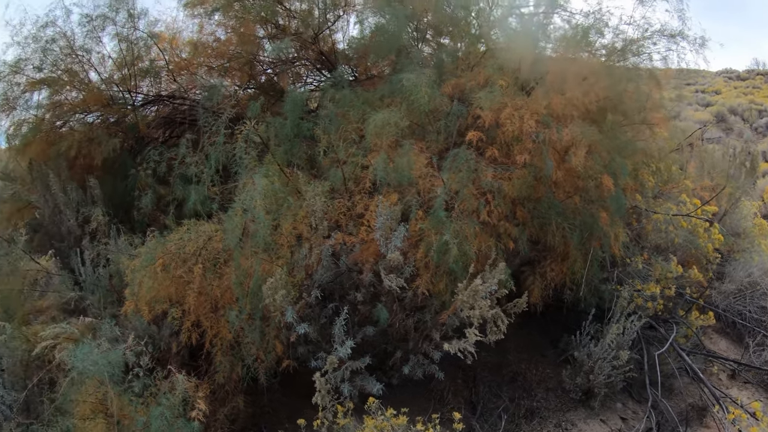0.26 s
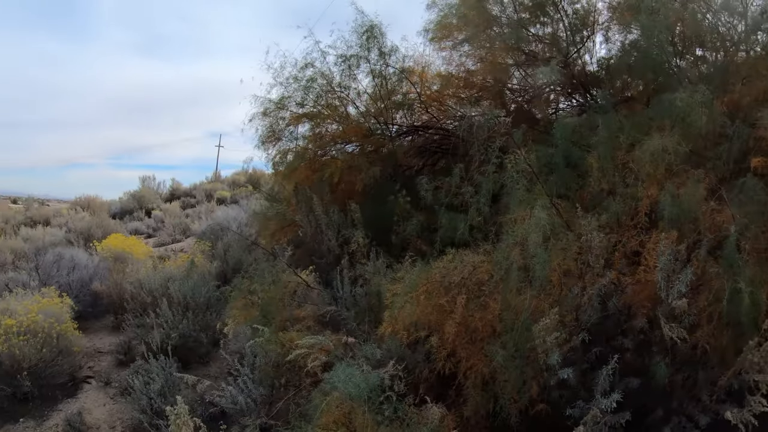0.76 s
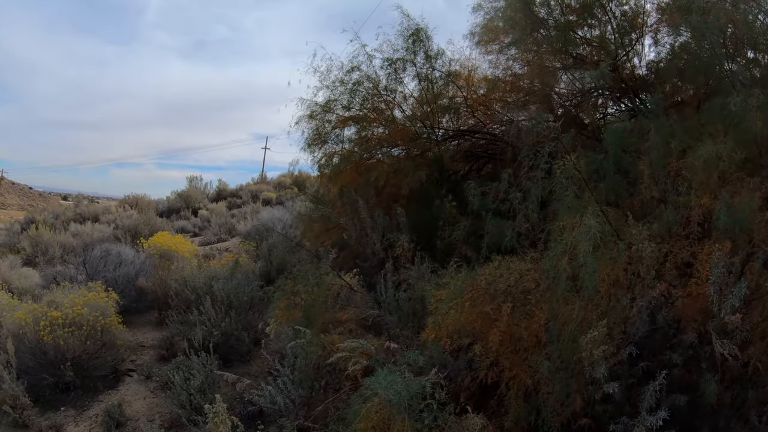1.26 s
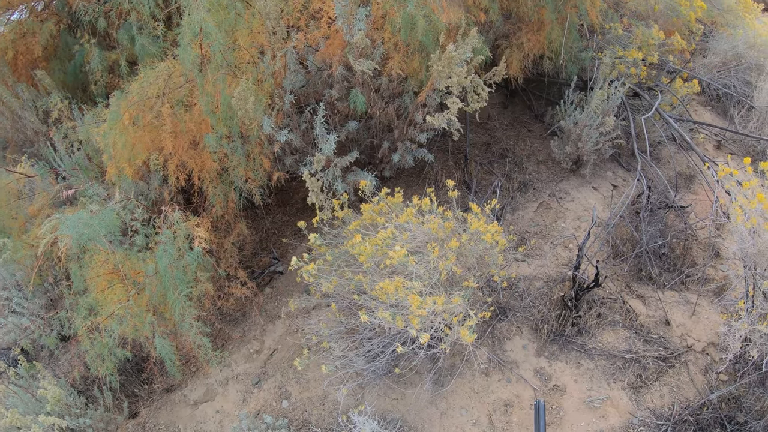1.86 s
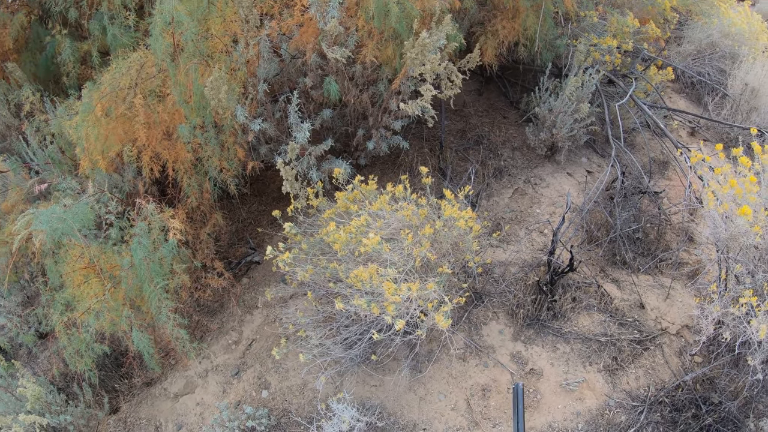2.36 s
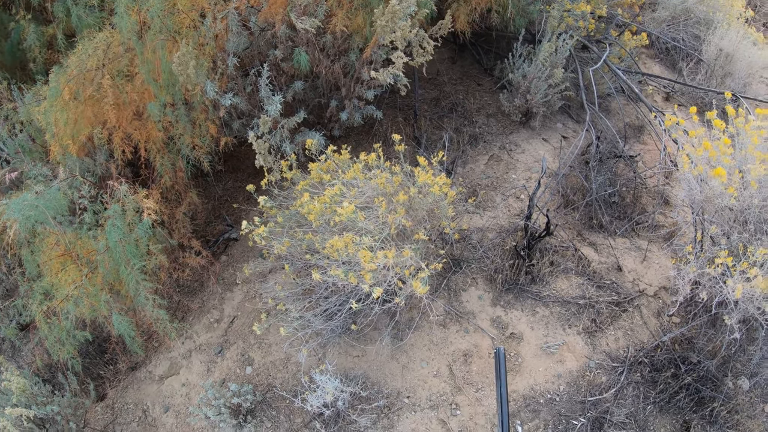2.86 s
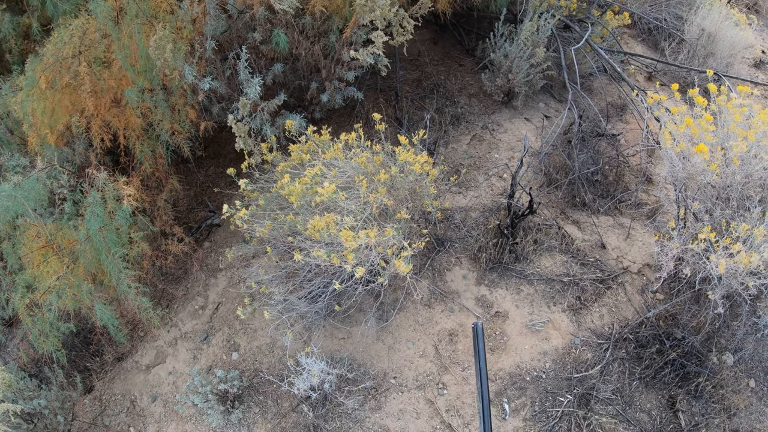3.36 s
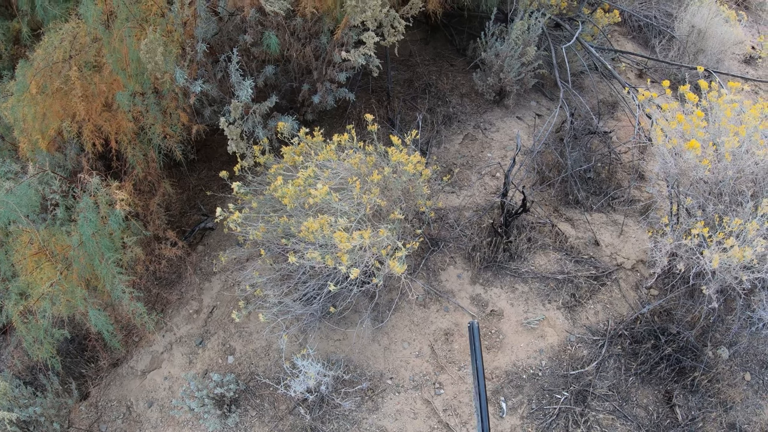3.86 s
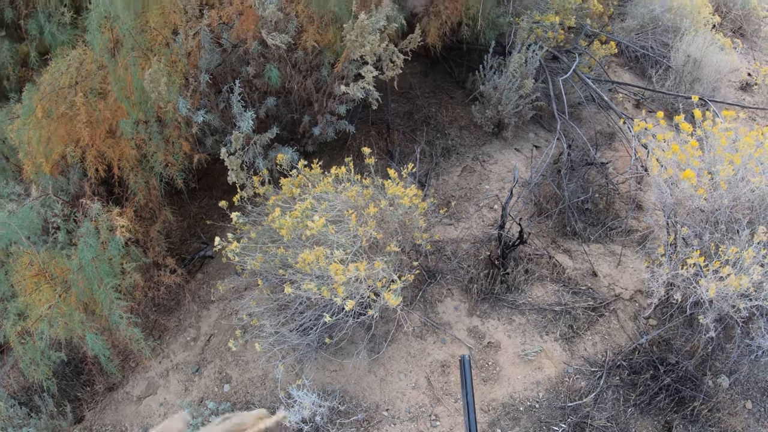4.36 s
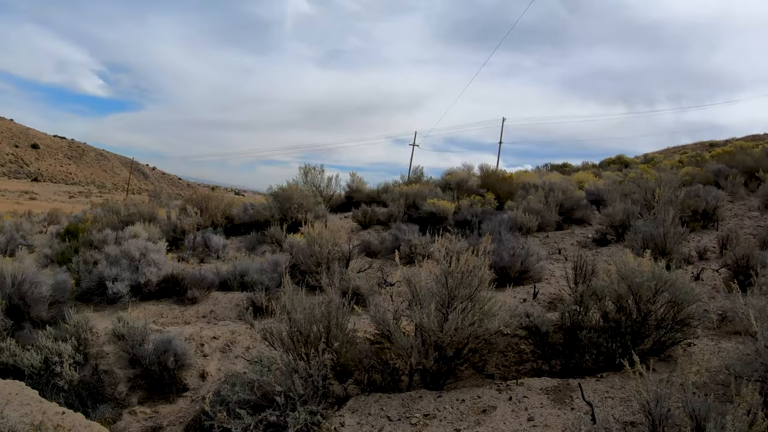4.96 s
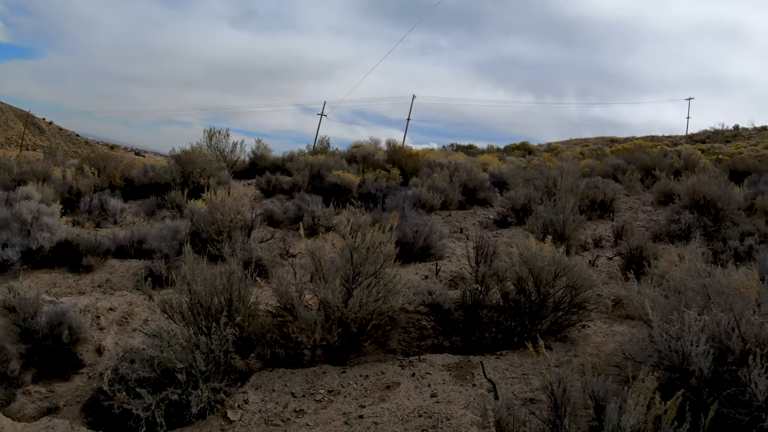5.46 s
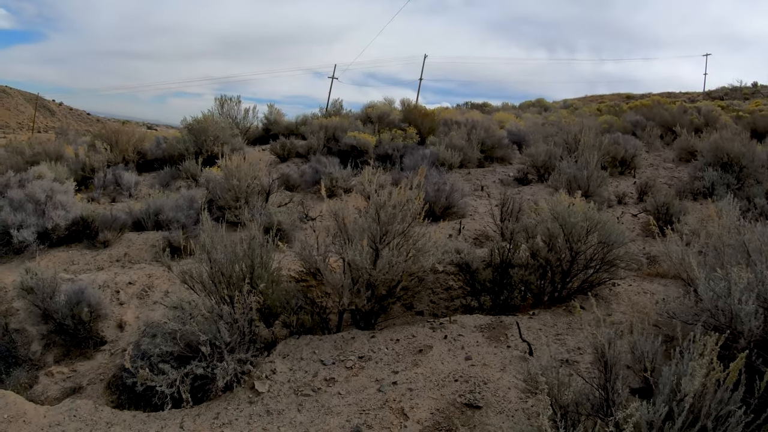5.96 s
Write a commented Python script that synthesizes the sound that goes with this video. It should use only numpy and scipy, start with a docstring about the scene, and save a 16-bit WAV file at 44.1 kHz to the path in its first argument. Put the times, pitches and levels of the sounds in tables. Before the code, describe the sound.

Low, unsteady wind rumble on a hand-held microphone runs throughout, with airy breeze and soft hiss. Quail call at once with three short nasal notes, pause, then call again more strongly from the middle distance, and finally lower and weaker. Small clicks mark sudden background shifts. Dry twig snaps, thin rustles and tiny bird chips dot the open scrub, with more handling bumps and a deep gust near the end.

```python
"""Quail in desert scrub

Quail call from the brush: short arched, reedy notes, some strong and some faint, each a sum of
seven harmonics coloured by throat resonances. Wind is shaped noise: buffeting and rumble on a
hand-held microphone, a distant rush of air and a breeze in the brush; its colour shifts between
stretches, with a click at two of the shifts. Dry twigs tick and bumps knock the housing as damped
rings, rustles are uneven crackle, and a small bird chips in swept tones."""
import sys
import numpy as np
from scipy import signal
from scipy.fft import rfft, irfft, next_fast_len
from scipy.io import wavfile
from scipy.ndimage import uniform_filter1d

SR = 44100
rng = np.random.default_rng(int(sys.argv[2]) if len(sys.argv) > 2 else 0)


def transcribe(u):
    """Save the signal u as a 16-bit wav file named by the first command-line argument.

    u: samples, shape (n,) or (channels, n), limited to [-1, 1]; the rate is SR.
    q: integer samples, one column per channel.
    """
    v = np.clip(np.atleast_2d(u).T, -1, 1)
    q = np.round(v * 32767).astype(np.int16)
    wavfile.write(sys.argv[1], SR, q)


N = 274302
T = np.arange(N) / SR  # time axis, s


def undb(db):
    """Decibels to gain."""
    return 10 ** (np.asarray(db) / 20)


def unit(x):
    """Scale to rms 1."""
    return x / np.sqrt(np.mean(x ** 2))


def response(hz, points):
    """Gain of an outline of (f/Hz, level/dB), falling steeply above its last point."""
    f, db = np.transpose(points)
    hz = np.maximum(hz, 1)
    outline = undb(np.interp(np.log(hz), np.log(f), db))
    return outline / np.maximum(hz / f[-1], 1) ** 2


def noise(points):
    """Noise with the given spectrum, rms 1."""
    size = next_fast_len(N)
    hz = np.fft.rfftfreq(size, 1 / SR)
    spectrum = rfft(rng.standard_normal(size)) * response(hz, points)
    return unit(irfft(spectrum, size)[:N])


def walk(rate):
    """Slow chance: smoothly joined random levels, rate of them per second, spread near 1."""
    k = int(SR / rate)
    steps = np.repeat(rng.standard_normal(N // k + 1), k)
    smooth = uniform_filter1d(uniform_filter1d(steps, k), k)
    return 1.21 * smooth[:N]


def band(x, hz, spread):
    """Band-pass from hz / spread to hz * spread, at least a narrow band and below the top of the range."""
    spread = max(spread, 1.05)
    edges = [hz / spread, min(hz * spread, .45 * SR)]
    return signal.sosfilt(signal.butter(2, edges, "band", fs=SR, output="sos"), x)


def add(out, s, x):
    """Mix x into out from time s on."""
    i = max(int(s * SR), 0)
    out[i:i + len(x)] += x[:max(N - i, 0)]


def hits(table, spread, ring, snap):
    """Each blow is a snap and a burst of crackle around one quickly damped resonance."""
    out, t = np.zeros(N), T[:SR // 10]
    for s, db, hz, t60 in table:
        decay = undb(-60 * t / t60)
        crackle = rng.standard_normal(len(t)) * decay
        hit = band(crackle + snap * (t == 0), hz, spread)
        hit = hit / np.abs(hit).max() + ring * decay * np.sin(2 * np.pi * hz * t)
        add(out, s, undb(db) * hit / np.abs(hit).max())
    return out


# breeze through the brush all around: t/s, level/dB
BREEZE_LEVEL = [(0, -58), (.3, -68.5), (.62, -55), (.95, -63), (1.3, -60.5), (1.55, -64.5), (1.62, -59.5),
                (2.1, -55), (2.9, -63), (3.3, -58.5), (4.15, -60), (4.4, -63.5), (4.8, -60.5), (5.1, -55),
                (5.42, -62.5), (5.8, -54.5), (6.22, -60)]
# colour of the breeze in the leaves: f/Hz, relative level/dB
LEAF_SPECTRUM = [(400, -12.5), (1000, 5), (1400, 1.5), (1900, -3), (2700, -10.5), (4000, -20.5),
                 (8000, -25.5), (16000, -37)]
# colour of the steady hiss: f/Hz, relative level/dB
HISS_SPECTRUM = [(100, 0), (3000, -1), (6000, -3), (10000, -4), (14000, -6), (20000, -5.5)]
HISS_DB = -68


def air(flicker_db=2.28):
    """The breeze swells and sinks in the brush, over steady hiss."""
    breeze_db = np.interp(T, *np.transpose(BREEZE_LEVEL)) + flicker_db * walk(12)
    return undb(breeze_db) * noise(LEAF_SPECTRUM) + undb(HISS_DB) * noise(HISS_SPECTRUM)


# wind at the microphone: t/s, slow buffeting level/dB, rumble level/dB
WIND_LEVELS = [(0, -37, -43.5), (1.4, -44.5, -45), (1.7, -43.5, -42), (2.8, -47, -41.5), (3.5, -48, -44.5),
               (4.7, -41, -46.5), (5.55, -41, -47.5), (5.66, -32.5, -45), (5.88, -27, -49),
               (6.22, -41, -50)]
# colour of the buffeting on the diaphragm: f/Hz, relative level/dB
BUFFET_SPECTRUM = [(1, -3), (4, 4), (9, 2.5), (16, -10), (30, -13), (60, -30.5), (150, -50)]
# stretches of background, each with its own colour: from t/s, crossfade t/s, far rush level/dB,
# rumble spectrum [f/Hz, relative level/dB], rush spectrum [f/Hz, relative level/dB]
BACKGROUND_STRETCHES = [ (0, 0.0025, -57.5, [(20, -4.5), (48, -7.5), (68, 1.5), (95, -6), (125, -9),
                        (160, -16.5), (250, -20), (430, -34), (1200, -77)], [(150, -7), (500, -7.5),
                        (700, -4.5), (900, 2), (1250, -3), (1600, -9), (2400, -25), (5000, -61)]),
                        (1.593, 0.0034, -57, [(20, 0), (40, 4), (70, -0.5), (95, -0.5), (150, -5.5),
                        (195, -15), (250, -20), (400, -39.5), (1200, -54)], [(150, -22), (300, -10),
                        (450, -4), (580, -4.5), (800, -0.5), (1000, -4.5), (1300, -13.5), (2000, -15),
                        (5000, -65)]), (3.0, 0.39, -58.5, [(20, -6.5), (40, 0), (70, 1), (95, -1),
                        (145, -7), (195, -17), (270, -22), (400, -35.5), (1200, -47)], [(150, -2.5),
                        (300, -9), (450, -4), (620, -6.5), (800, 0.5), (1000, -2), (1300, -8.5),
                        (1900, -30), (5000, -33)]), (4.848, 0.0034, -54.5, [(20, -3.5), (48, -2), (68, -4),
                        (95, -11.5), (125, -12.5), (190, -24), (300, -34.5), (1200, -56)], [(150, -5),
                        (400, -8.5), (600, -7.5), (800, -4), (1020, -1), (1300, -2.5), (1700, -12.5),
                        (2500, -24), (5000, -27.5)]), ]


def wind(gust_db=0.75):
    """Large eddies push the diaphragm, small ones rumble; rumble and far rush change colour by stretches."""
    s, *columns = np.transpose(WIND_LEVELS)
    buffet_db, rumble_db = (np.interp(T, s, c) for c in columns)
    gusts = undb(rumble_db + gust_db * walk(14))
    out = np.zeros(N)
    for start, crossfade_s, rush_db, rumble, rush in BACKGROUND_STRETCHES:
        # equal-power crossfade into this stretch
        share = np.clip((T - start) / crossfade_s, 0, 1)
        stretch = gusts * noise(rumble) + undb(rush_db) * noise(rush)
        out = np.cos(share * np.pi / 2) * out + np.sin(share * np.pi / 2) * stretch
    return out + undb(buffet_db) * noise(BUFFET_SPECTRUM)


# sharp clicks where the background changes abruptly: t/s, level/dB
BACKGROUND_CLICKS = [(1.5952, -41), (4.848, -31.5)]


def clicks(relax_s=0.00058):
    """A sudden step that relaxes at once."""
    out = np.zeros(N)
    for s, db in BACKGROUND_CLICKS:
        add(out, s, undb(db) * np.exp(-T[:SR // 20] / relax_s))
    return out


# the hand against the housing, right at the microphone: t/s, peak level/dB, ring f/Hz, t60 t/s
HOUSING_BUMPS = [(3.8676, -46, 1060, 0.016), (4.7825, -38, 1110, .035), (5.252, -42, 800, 0.025),
                 (5.3436, -40.5, 1070, 0.026), (5.5063, -42, 534, 0.02), (5.7956, -45, 475, .03),
                 (5.8185, -41.5, 675, 0.011)]


def bumps():
    """Each knock makes the housing ring strongly and briefly."""
    return hits(HOUSING_BUMPS, spread=1.22, ring=0.84, snap=3.1)


# dry rustles and scuffs out in the brush: t/s, length t/s, centre f/Hz, level/dB before the swell
BRUSH_RUSTLES = [(.8, 0.018, 3800, -70), (1.08, .3, 5550, -75), (1.586, 0.075, 3980, -65.5),
                 (2.03, .2, 8500, -75), (3.563, .025, 5970, -67.5), (3.698, 0.12, 5940, -72),
                 (4.208, 0.085, 5700, -69), (4.535, .081, 3880, -68), (4.83, 0.16, 1540, -60),
                 (5.587, 0.024, 4600, -65), (5.685, .11, 5500, -74), (5.796, 0.056, 4730, -59.5)]


def rustles(grain_db=4.0, spread=1.3):
    """Swells of fine, uneven crackle from dry brush and sand."""
    out = np.zeros(N)
    grains = rng.standard_normal(N) * undb(grain_db * walk(400))
    for s, length, hz, db in BRUSH_RUSTLES:
        burst = grains[int(s * SR):int((s + length) * SR)]
        swell = np.sqrt(np.hanning(len(burst)))
        add(out, s, undb(db) * unit(band(burst, hz, spread)) * swell)
    return out


# dry twigs snapping in the brush: t/s, peak level/dB, ring f/Hz, t60 t/s, splinter level/dB re the snap
TWIG_SNAPS = [(2.1225, -54, 6000, .008, -12), (3.867, -47, 3470, 0.0089, -28),
              (4.407, -39, 9200, 0.0042, -27), (4.4433, -48.5, 8200, .016, -12),
              (4.548, -48.5, 5530, 0.01, -6), (4.7825, -39.5, 6500, 0.0091, -12),
              (5.7109, -49, 3800, 0.023, -18)]
# typical spacing, level drop per tick (negative: each tick louder), ring relative to the snap
SPLINTER_GAP_S, SPLINTER_DROP_DB, SPLINTER_PITCH = 0.0083, -1, 1.24


def twigs(count=4, unevenness=0.21, splinter_t60=0.0077):
    """A twig snaps, then splinters in a few ticks at uneven gaps, each slightly louder than the last."""
    ticks = []
    gaps = SPLINTER_GAP_S * np.exp(unevenness * rng.standard_normal((len(TWIG_SNAPS), count)))
    for (s, db, hz, t60, splinter_db), delays in zip(TWIG_SNAPS, np.cumsum(gaps, axis=1)):
        ticks.append((s, db, hz, t60))
        for k, delay in enumerate(delays):
            tick_db = db + splinter_db - k * SPLINTER_DROP_DB
            ticks.append((s + delay, tick_db, hz * SPLINTER_PITCH, splinter_t60))
    return hits(ticks, spread=1.27, ring=0.16, snap=3.3)


# small bird's chips from the brush: t/s, length t/s, start f/Hz, end f/Hz, level/dB at the middle
BIRD_CHIPS = [(1.59, .025, 3880, 3850, -64), (2.778, 0.0061, 4900, 3900, -61.5),
              (3.8655, .007, 5300, 5100, -58), (4.103, .01, 5300, 5000, -66),
              (4.444, 0.025, 2410, 2050, -61.5), (5.203, 0.0079, 3570, 5800, -58)]


def chips():
    """Tiny swept whistles of a small bird."""
    out = np.zeros(N)
    for s, length, start_hz, end_hz, db in BIRD_CHIPS:
        hz = np.linspace(start_hz, end_hz, int(length * SR))
        whistle = np.sin(2 * np.pi * np.cumsum(hz) / SR)
        add(out, s, np.sqrt(2) * undb(db) * np.hanning(len(hz)) * whistle)
    return out


def arch(start, rise, fall, rise_shape, fall_shape):
    """Climb from 0 to 1 and drop back; 0 outside the note."""
    past_top = T - start - rise
    inside = (past_top > -rise) & (past_top < fall)
    t, out = past_top[inside], np.zeros(N)
    climb = np.abs(t / rise) ** rise_shape
    drop = np.abs(t / fall) ** fall_shape
    out[inside] = 1 - np.where(t < 0, climb, drop)
    return out


# throat and beak, with a broad resonance from 1.6 to 2.4 kHz and a narrow one near 5.9 kHz: f/Hz, level/dB
THROAT_RESPONSE = [(700, -7), (1150, -4), (1600, -1.5), (2400, -2), (2800, -6), (3500, -18), (4200, -21),
                   (4700, -29.5), (5200, -25), (5600, -13.5), (5900, -11.5), (6400, -27), (7100, -30),
                   (8300, -46)]
# quail notes from the brush, each one arch of pitch: start t/s, rise t/s, fall t/s, top f/Hz,
# rise shape, fall shape (1 is a straight slope, 5 a flat top with a steep edge),
# level/dB at the top before colouring, then fundamental level/dB, reedy overtones level/dB and
# high whistle level/dB, all relative to the second harmonic before the throat
QUAIL_NOTES = [ (0, 0.039, .035, 1142, 1.64, 2, -51, 6.5, 0, -8),
               (0.189, 0.095, 0.077, 1164, 2.55, 4.4, -51, 5.5, -4, 2.5),
               (0.438, 0.04, 0.072, 1187, 2.3, 0.99, -53, 6, -3, 0.5),
               (2.269, 0.15, 0.062, 1064, 1.27, 5.9, -51.5, 0, -14, -23),
               (2.586, 0.039, 0.1, 1127, 2.84, 1.7, -49.5, 1.5, -13, -20),
               (2.649, 0.034, .08, 1174, 2.4, 0.95, -54.5, -3, -3, -18),
               (3.184, 0.046, 0.04, 1179, 1.5, 3.8, -45, -3, -4.5, -16),
               (3.389, 0.094, .063, 1213, 2.7, 4.3, -45, -1, -11, -10),
               (3.624, .042, 0.073, 1348, 2.3, 1.5, -51.5, 1, -8, -5),
               (4.896, 0.034, 0.045, 883, 1.46, 2.26, -56.5, 7, -12, -15),
               (5.141, 0.074, 0.13, 986, 2.4, 2, -52.5, 1.5, -24, -25),
               (5.446, 0.065, 0.16, 1147, 3.3, 1.8, -67.5, 1, -12, -13),
               (6.17, 0.062, .1, 890, 2.5, 2.2, -53, -8, -4, -24), ]
REST_HZ = 689  # pitch at the foot of every arch, before waver
EFFORT_DB = 14  # effort raises a note this much from foot to top, before colouring


def quail(waver=0.0048, shimmer_db=1.0, fade_s=0.0036, open_db=8, reed_swell_db=4):
    """The syrinx sweeps an arch of pitch; each harmonic lights up as it crosses a throat resonance."""
    out = np.zeros(N)
    jitter = 1 + waver * walk(300)
    flutter = [undb(shimmer_db * walk(90)) for _ in range(7)]
    arches = [arch(start, rise, fall, up, down) for start, rise, fall, _, up, down, *_ in QUAIL_NOTES]
    highest = np.max(arches, axis=0)
    for height, note in zip(arches, QUAIL_NOTES):
        _, _, _, top_hz, _, _, db, fundamental_db, reed_db, whistle_db = note
        # where two notes run together, the higher arch takes over
        i = np.flatnonzero((height > 0) & (height >= highest))
        hz = (REST_HZ + (top_hz - REST_HZ) * height[i]) * jitter[i]
        phase = 2 * np.pi * np.cumsum(hz) / SR
        edge_s = np.minimum(T[i] - T[i[0]], T[i[-1]] - T[i])
        gate = np.clip(edge_s / fade_s, 0, 1)
        effort = np.sqrt(2) * gate * undb(db + EFFORT_DB * (height[i] - 1))
        # the beak is widest at the top of the arch, where the high whistle comes out
        high_db = whistle_db + open_db * (hz / top_hz - 1)
        # the voice grows reedier with effort
        mid_db = reed_db + reed_swell_db * (height[i] - 1)
        colours = [fundamental_db, 0, mid_db, mid_db, high_db, high_db, high_db]
        for k, (colour_db, shimmer) in enumerate(zip(colours, flutter), 1):
            gain = effort * shimmer[i] * undb(colour_db) * response(k * hz, THROAT_RESPONSE)
            out[i] += gain * np.sin(k * phase)
    return out


def scrub(x, wet_db=-21, t60=0.48, delay_s=0.006):
    """Bushes and banks scatter a thin, short echo."""
    t = T[:SR // 2]
    scatter = band(rng.standard_normal(len(t)), 2600, spread=3.1)
    tail = scatter * undb(-60 * t / t60) * (t > delay_s)
    echo = signal.fftconvolve(x, tail / np.linalg.norm(tail))[:N]
    return x + undb(wet_db) * echo


def scene():
    """Birds, twigs and rustles in the brush, wind and bumps, and clicks where the background changes abruptly."""
    background = air() + wind() + clicks()
    brush = scrub(rustles() + twigs() + chips() + quail())
    return (background + bumps() + brush)[None]


TOP_HZ = 15800  # upper edge of what passes


def record(dry):
    """A steep elliptic low-pass cuts the top of the sound."""
    return signal.sosfilt(signal.ellip(10, .1, 70, TOP_HZ, fs=SR, output="sos"), dry)


dry = scene()
out = record(dry)
transcribe(out)
```